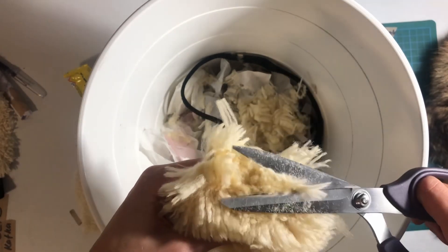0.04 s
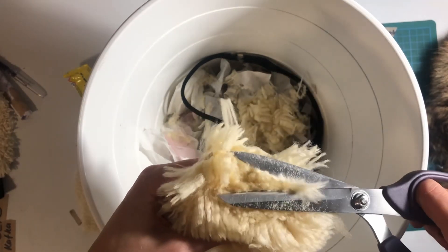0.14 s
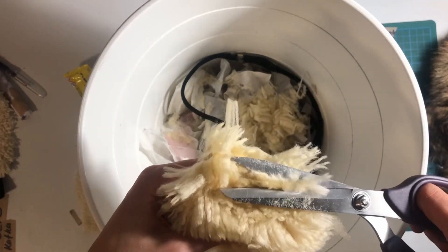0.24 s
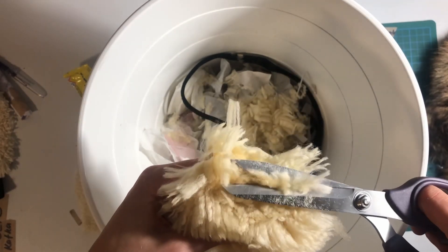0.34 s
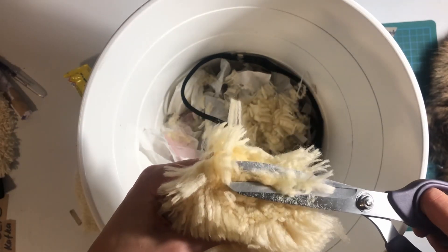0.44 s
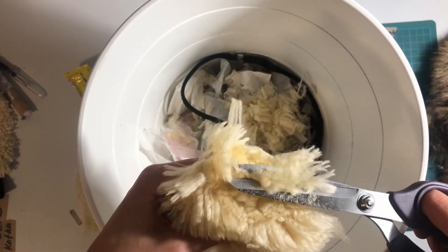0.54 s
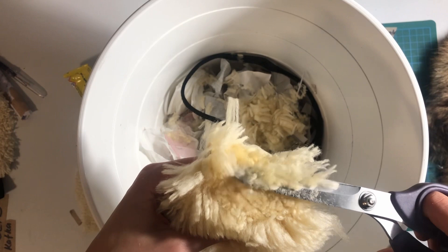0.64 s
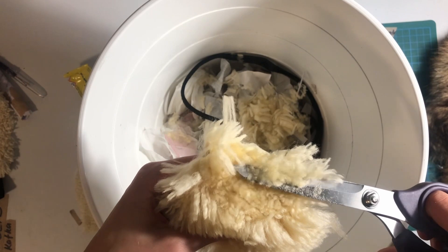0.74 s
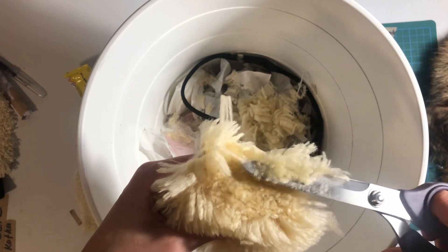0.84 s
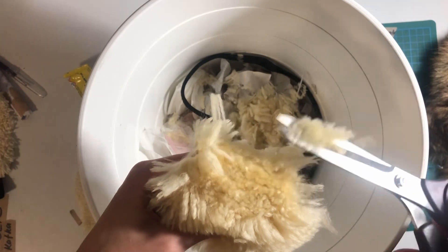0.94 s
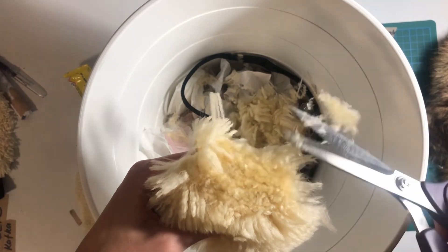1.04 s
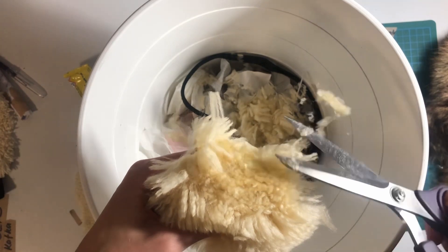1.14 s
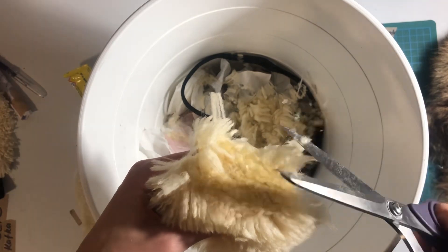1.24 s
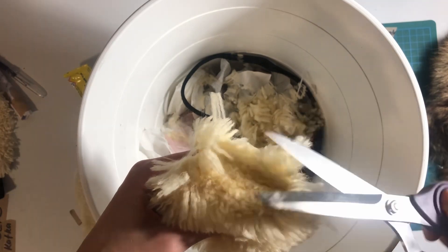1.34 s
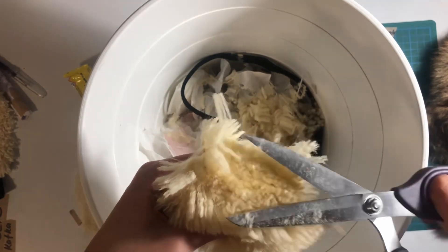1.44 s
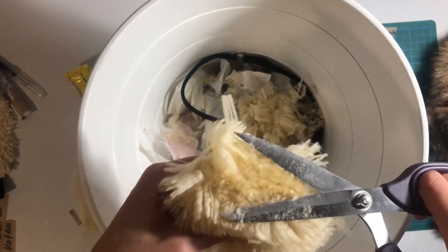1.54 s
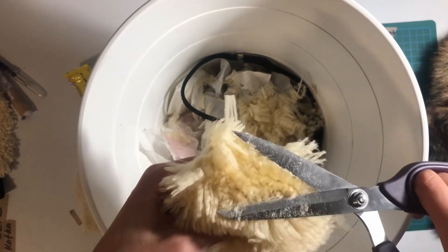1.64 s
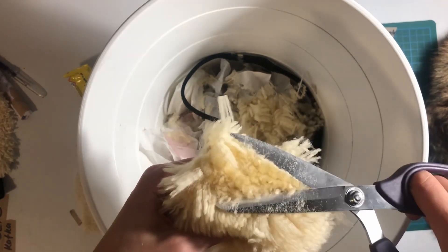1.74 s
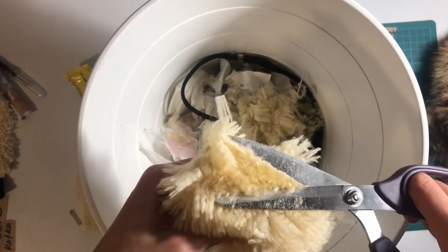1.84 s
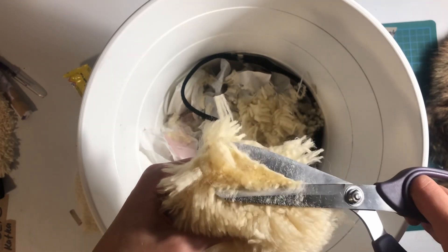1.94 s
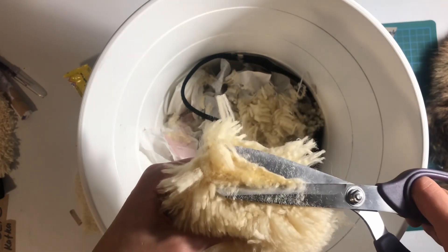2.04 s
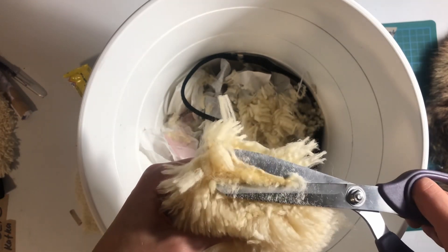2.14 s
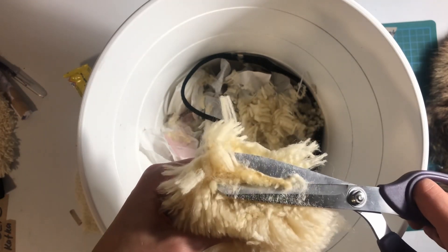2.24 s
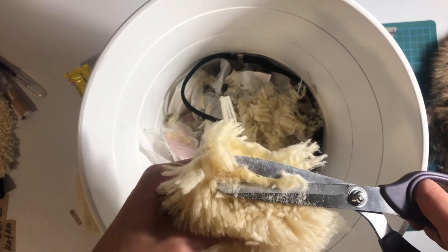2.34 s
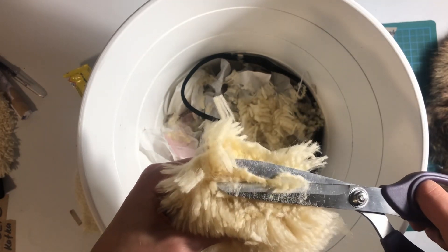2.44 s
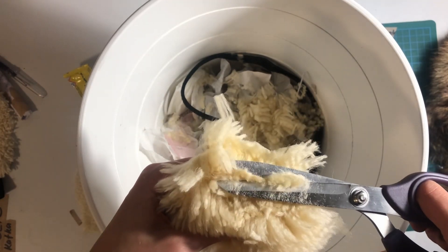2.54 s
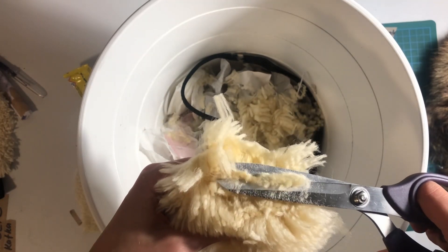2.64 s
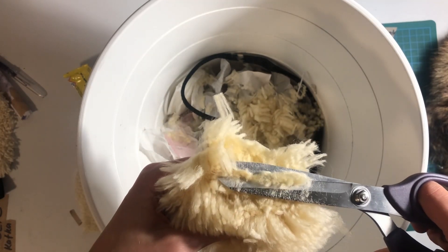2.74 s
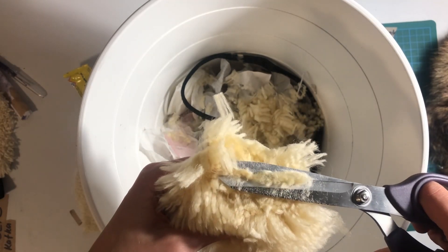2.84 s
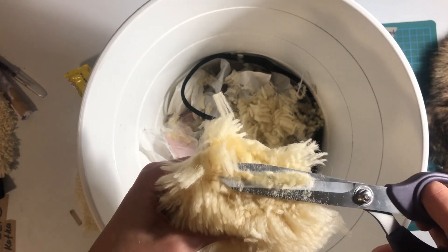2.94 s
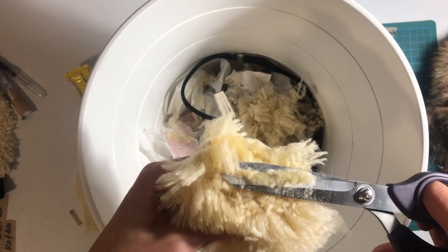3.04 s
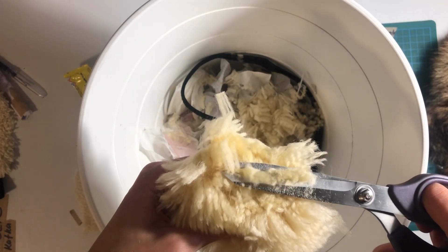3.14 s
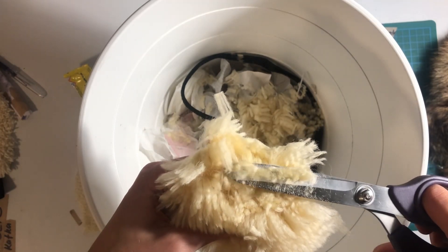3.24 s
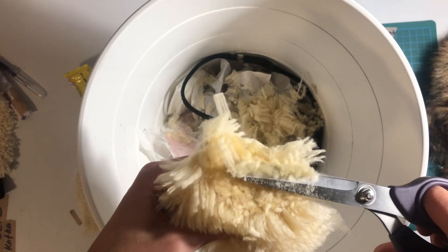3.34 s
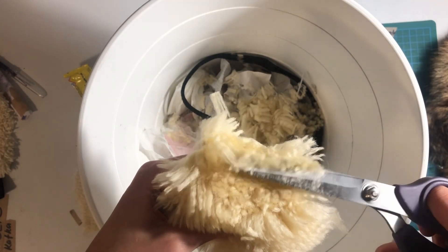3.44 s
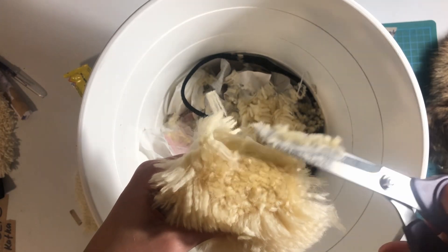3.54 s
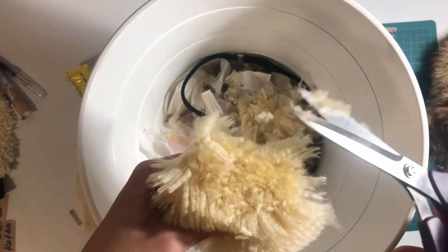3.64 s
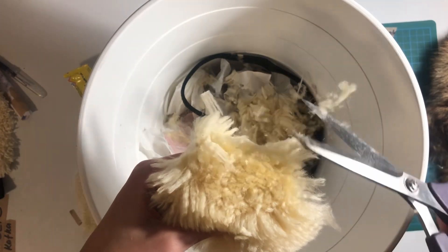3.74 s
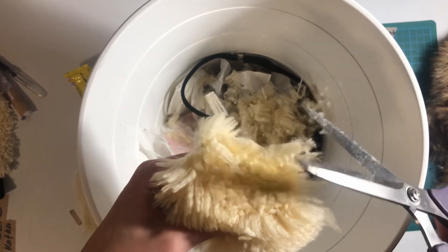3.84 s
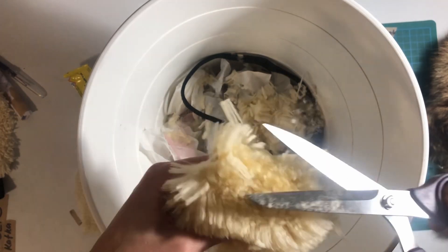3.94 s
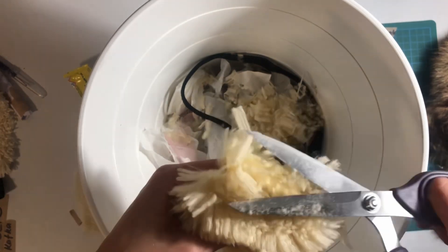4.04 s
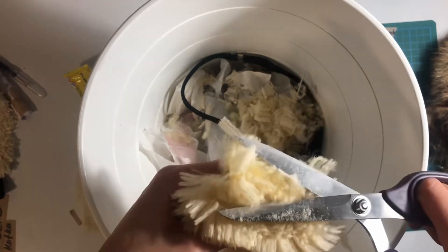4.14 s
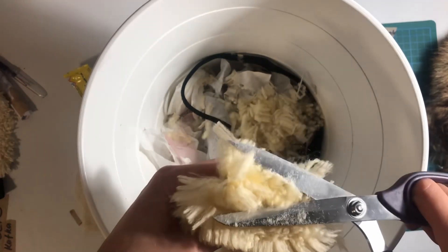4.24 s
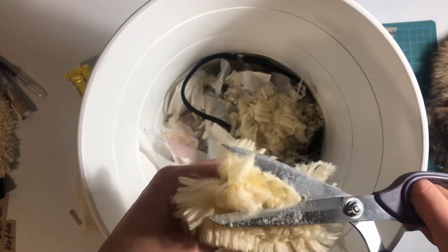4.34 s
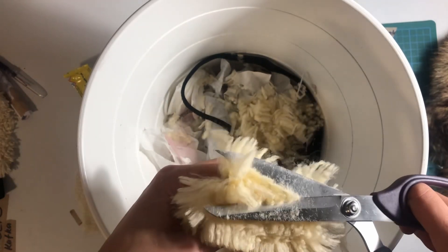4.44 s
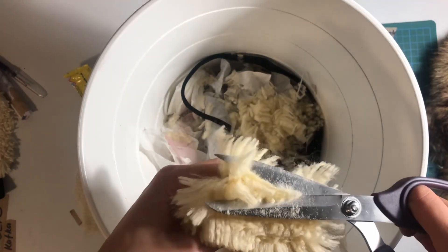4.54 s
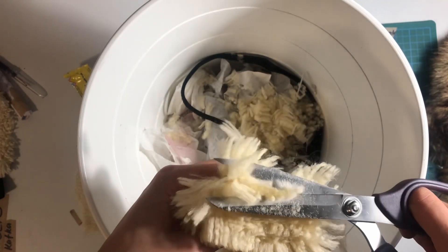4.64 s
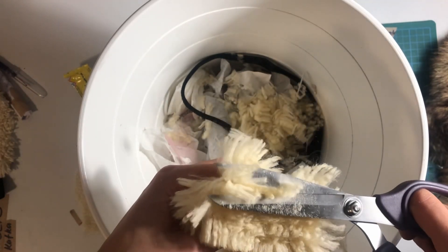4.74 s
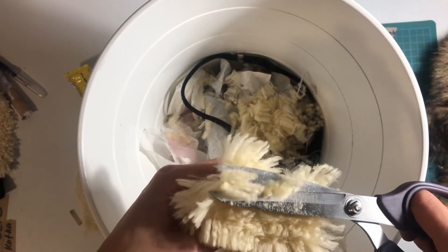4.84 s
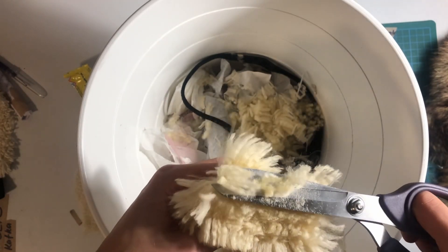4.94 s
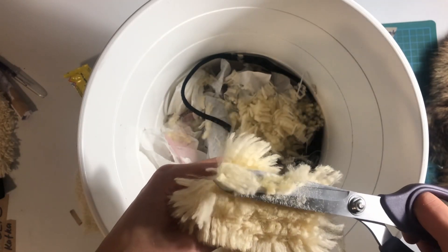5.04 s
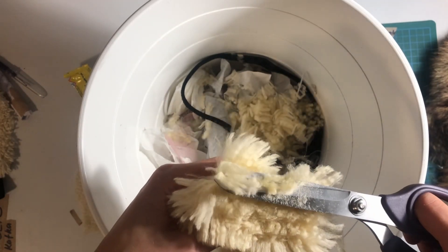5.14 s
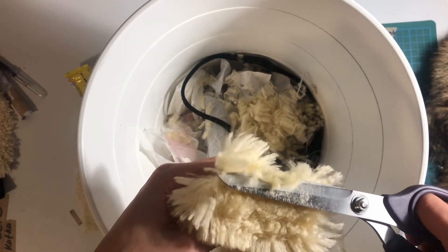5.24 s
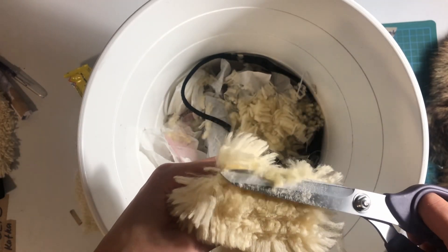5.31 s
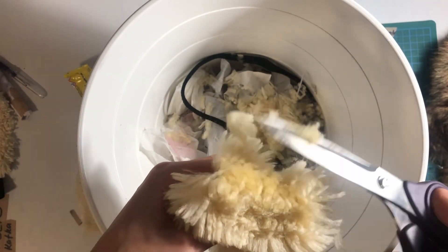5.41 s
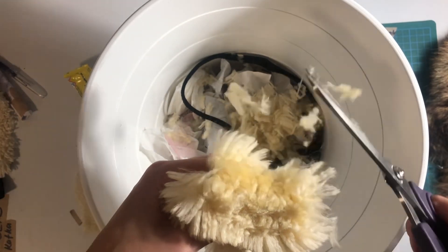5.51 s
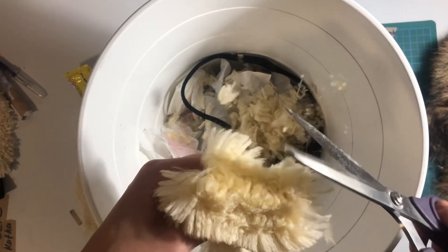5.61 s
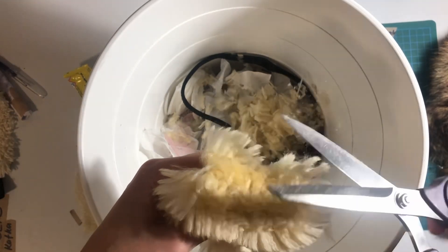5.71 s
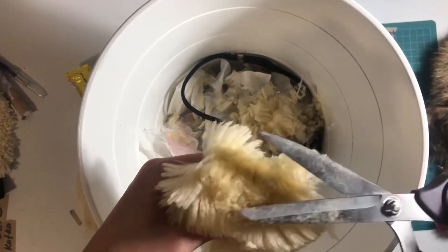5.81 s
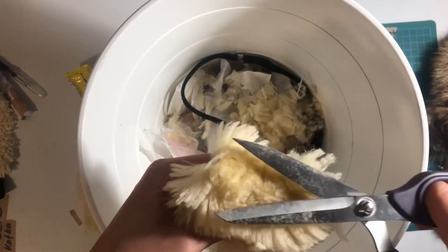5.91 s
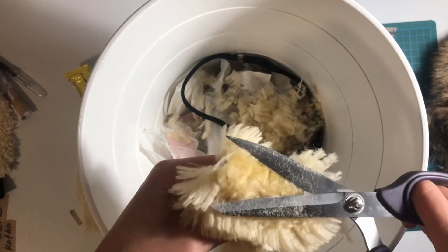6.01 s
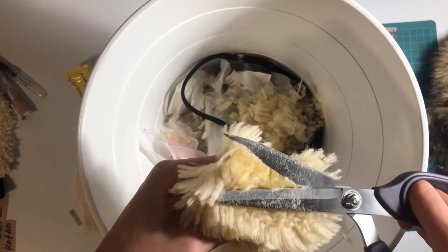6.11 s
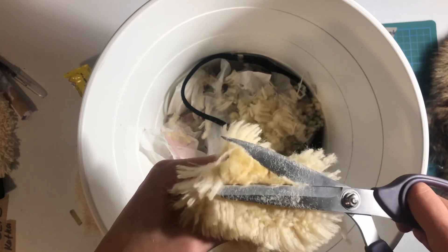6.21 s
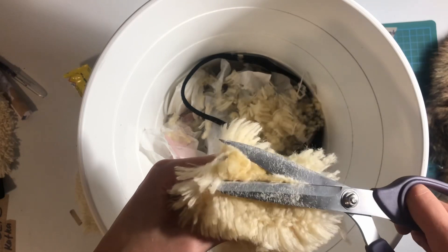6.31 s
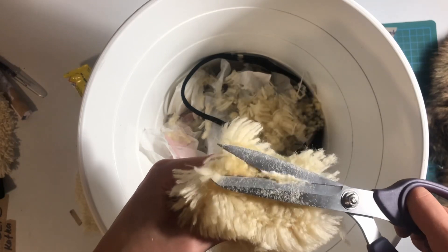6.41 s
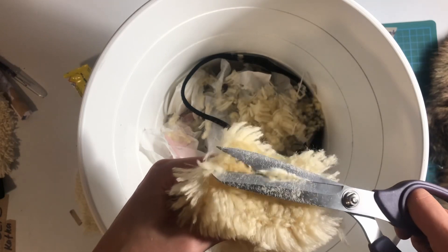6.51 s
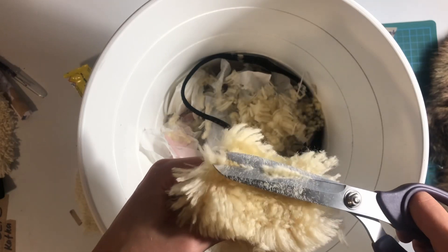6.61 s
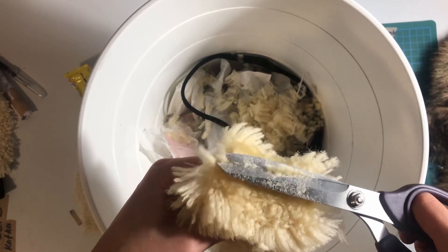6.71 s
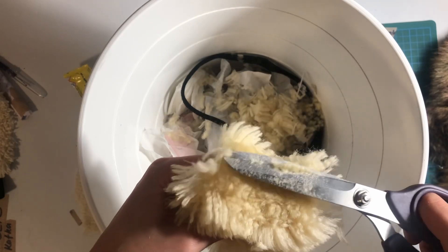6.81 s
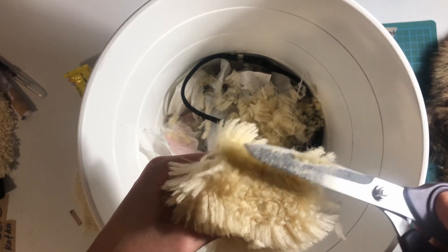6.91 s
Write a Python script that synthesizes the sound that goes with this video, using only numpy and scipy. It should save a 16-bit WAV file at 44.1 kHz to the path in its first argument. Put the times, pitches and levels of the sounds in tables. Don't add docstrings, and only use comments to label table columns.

```python
import sys
import numpy as np
from scipy import signal
from scipy.io import wavfile

SR = 44100
rng = np.random.default_rng(int(sys.argv[2]) if len(sys.argv) > 2 else 0)


def rack_gain(trim_db):
    fader = np.asarray(trim_db, float)
    return 10 ** (fader / 20)


def pcm_store(signal):
    levels = np.round(np.clip(np.atleast_2d(signal), -1, 1) * 32767)
    wavfile.write(sys.argv[1], SR, levels.astype(np.int16).T)


N = 307377


def rms_one(x):
    return x / np.sqrt(np.mean(x ** 2) + 1e-20)


def band_pass(x, low_hz, high_hz, order=2):
    return signal.sosfilt(signal.butter(order, [low_hz, high_hz], "band", fs=SR, output="sos"), x)


def high_pass(x, hz, order):
    return signal.sosfilt(signal.butter(order, hz, "high", fs=SR, output="sos"), x)


def drift(rate_hz):
    r = np.exp(-80 * np.pi * rate_hz / SR)
    slow = signal.lfilter([1], [1, -2 * r, r * r], rng.standard_normal(N // 40 + 2002))[2000:]
    return np.interp(np.arange(N) / 40, np.arange(len(slow)), rms_one(slow))


def in_time(tables, column, rest):
    out, t = np.full(N, float(rest)), np.arange(N) / SR
    for rows in tables:
        rows = np.array(rows)
        inside = (t >= rows[0, 0]) & (t <= rows[-1, 0])
        out[inside] = np.interp(t[inside], rows[:, 0], rows[:, column])
    return out


def laid_out(shape, events):
    return [[(s + share * length_s, hz, db + level_db, *rest) for share, hz, db, *rest in shape]
            for s, length_s, level_db in events]


def burst_power(events, level_db, rise, fall, corner):
    out, steps = np.zeros(N + 6000), np.arange(-3000, 3000)
    for (s, ms, *_), db in zip(events, level_db):
        width = np.where(steps < 0, rise, fall) * max(ms, 2) * SR / 1000
        out[round(s * SR) + steps + 3000] += rack_gain(2 * db) * np.exp(-np.abs(steps / width) ** corner)
    return out[3000:-3000]


# frequency in Hz, level in dB.
ROOM_TONE = [(22, -44), (64, 1.5), (123, -5.5), (229, -4.5), (870, -14.5), (1400, -19.5), (4740, -22.5),
             (16000, -26)]
ROOM_TONE_DB = -42
SMOOTH_ABOVE_HZ = 9900


def room_tone(patchy_db=2.0):
    out, edges_hz, points = 0, 18 * 2 ** np.arange(0, 10.1, .5), np.array(ROOM_TONE)
    white = rng.standard_normal((2, N))
    for k, (low, high) in enumerate(zip(edges_hz, edges_hz[1:])):
        level_db = np.interp(np.log(low * high) / 2, np.log(points[:, 0]), points[:, 1])
        flicker_db = patchy_db / (1 + low / SMOOTH_ABOVE_HZ) * drift(12.0)
        out = out + rack_gain(level_db + flicker_db) * band_pass(white[k % 2], low, high)
    return rack_gain(ROOM_TONE_DB) * rms_one(out)


# frequency in Hz, t60 in s.
ROOM_T60 = [(300, 0.28), (1200, 0.35), (3000, 0.23), (4800, 0.28), (7000, 0.23), (14000, 0.089)]
ROOM_DB, FIRST_ECHO_S = -14, 0.0022


def room(x):
    t, points = np.arange(SR // 2) / SR, np.array(ROOM_T60)
    edges_hz, answer = 150 * 2 ** np.arange(0, 7.1, .5), 0
    for low, high in zip(edges_hz, edges_hz[1:]):
        t60_s = np.interp(np.log(low * high) / 2, np.log(points[:, 0]), points[:, 1])
        answer = answer + band_pass(rng.standard_normal(len(t)), low, high) * rack_gain(-60 * t / t60_s)
    answer = answer * np.clip(t / FIRST_ECHO_S, 0, 1) ** 2
    return signal.fftconvolve(x, answer / np.sqrt(np.sum(answer ** 2)))[:N]


# time in seconds, level in dB, pitch in Hz.
NUDGES = [(2.615, -37, 315), (3.095, -35, 300), (5.384, -36, 308), (5.597, -39, 272), (5.711, -33, 316),
          (5.809, -36.5, 262)]
NUDGE_RISE_S, NUDGE_T60_S = 0.0014, 0.15


def bucket():
    out, t = np.zeros(N + SR), np.arange(SR // 4) / SR
    for s, db, hz in NUDGES:
        envelope = rack_gain(db - 60 * t / NUDGE_T60_S) * (1 - np.exp(-t / NUDGE_RISE_S))
        out[round(s * SR) + np.arange(len(t))] += envelope * np.sin(2 * np.pi * hz * t)
    return out[:N]


# time in seconds, length in ms, low band in dB, high band in dB, tip squeak in dB.
SNAPS = [
    (0.6516, 4.1, -16, -10, -14),
    (3.3207, 4.9, -19, -4, -1),
    (3.324, 5.8, -8, -4, -11),
    (5.227, 6.2, -17.5, -8.5, -18),
]
# lower edge in Hz, upper edge in Hz.
SNAP_BANDS_HZ = [(2000, 4500), (6000, 17800), (13400, 14700)]


def snaps():
    out = 0
    for band_hz, level_db in zip(SNAP_BANDS_HZ, np.transpose(SNAPS)[2:]):
        band = rms_one(band_pass(rng.standard_normal(N), *band_hz))
        out = out + band * np.sqrt(burst_power(SNAPS, level_db, rise=0.071, fall=0.42, corner=1.16))
    return out


# time in seconds, blow in dB, thud share in dB.
CLACKS = [
    (0.6538, 2, -3.5),
    (3.3251, 12.5, -9.5),
    (5.228, 0, -2.5),
]
# frequency in Hz, level in dB, t60 in s.
CRACK = [(7700, -14, 0.003), (6800, -10, .004), (6080, -6, 0.005), (5130, -11, 0.003), (4400, -5, 0.003),
         (3500, -9, .004), (3050, -7, 0.006), (2750, -4, 0.009), (2430, -7, .011), (2200, -13, .013),
         (2010, -12, .009)]
# frequency in Hz, level in dB, t60 in s.
THUD = [(1720, -11, 0.0054), (1290, -2.5, 0.021), (864, -7, 0.023), (730, -4, 0.016), (407.5, -4, 0.021),
        (300, -9.5, 0.017), (222, -21, 0.013), (139, -23, 0.043)]
CRACK_DB = -1
BUILD_UP_CYCLES = 1.19


def handles():
    out, rattle = np.zeros(N), np.arange(130)
    for modes, thud in ((CRACK, 0), (THUD, 1)):
        for k, (hz, db, t60_s) in enumerate(modes):
            clicks = np.full(N, 1e-18)
            sign_gain = (-1) ** k if thud else -rack_gain(CRACK_DB)
            for s, blow_db, thud_db in CLACKS:
                bounces = rng.standard_normal(len(rattle)) * np.exp(-rattle / 40)
                contacts = (rattle == 0) + 0.36 * (1 - thud) * bounces
                start = round((s + thud * BUILD_UP_CYCLES / hz) * SR)
                clicks[start + rattle] = rack_gain(blow_db + thud * thud_db + db - 9.5) * contacts * sign_gain
            r, w = rack_gain(-60 / (t60_s * SR)), 2 * np.pi * hz / SR
            out += signal.lfilter([0, np.sin(w)], [1, -2 * r * np.cos(w), r * r], clicks)
    return high_pass(out, 90, 2)


# seconds at the pivot, half way, at the tips.
STROKES = [
    (0.05, 0.46, 0.66),
    (1.86, 2.47, 3.3),
    (4.46, 4.93, 5.23),
    (6.12, 6.58, 6.73),
]


def place_at(s):
    return np.interp(s, np.ravel(STROKES), np.tile([-.5, 0, .5], len(STROKES)))


# time in seconds, level in dB.
GRIND = [
    [(.03, -61), (.09, -40), (.25, -40), (.28, -57), (.35, -52), (.40, -51), (.47, -45), (.53, -38),
     (.63, -40)],
    [(1.84, -54.5), (1.93, -40.5), (2.0, -36.5), (2.22, -43.5), (2.26, -60), (2.33, -50.5), (2.41, -35),
     (2.45, -61)],
    [(2.46, -52.5), (2.63, -32), (2.68, -60), (2.76, -44.5), (2.81, -55), (2.92, -56)],
    [(2.93, -61), (3.04, -50), (3.2, -42.5), (3.29, -53), (3.33, -37)],
    [(4.44, -65), (4.5, -40.5), (4.68, -35.5), (4.73, -51.5), (4.82, -45), (4.87, -60), (4.96, -39),
     (5.09, -65), (5.22, -33)],
    [(6.1, -56), (6.2, -43.5), (6.4, -39), (6.52, -42), (6.55, -42), (6.585, -53)],
    [(6.59, -45), (6.61, -33), (6.64, -40), (6.69, -44), (6.72, -52), (6.75, -62), (6.91, -77)],
]
# handle in dB, bending in dB, edge in dB, top in dB, flank mode in the grind in dB.
GRIP = [(-0.6, -0.4, -2.9, 2.5, -4), (-1.5, -1, -1.5, 0, -8), (-0.5, 0, -0.3, -2.5, 3.5),
        (-2, -1.8, -0.6, -0.5, 1), (-0.5, -0.9, -1.5, -0.3, 2), (-2, -2.5, -1.5, 1, -8),
        (0, 0.3, -1, -2, -7)]


def grip(column):
    held = [[(push[0][0], load[column]), (push[-1][0], load[column])] for push, load in zip(GRIND, GRIP)]
    return in_time(held, column=1, rest=0)


def fibres(per_s, spread_db):
    sizes = rack_gain(spread_db * np.minimum(rng.exponential(1, N), 5)) * rng.choice([-1, 1], N)
    return rms_one(sizes * (rng.random(N) < per_s / SR) + 1e-9)


def resonate(x, hz, width_hz):
    r = np.exp(-np.pi * width_hz / SR)
    top = np.array([1, 0, -1]) * (1 - r * r) / 2
    return signal.lfilter(top, [1, -2 * r * np.cos(2 * np.pi * hz / SR), r * r], x)


def mode_group(force, modes, wander_db):
    place = place_at(np.arange(N) / SR)
    out, power = 0, 0
    for hz, width_hz, db, travel_db in modes:
        gain = rack_gain(db + travel_db * place)
        struck = force * rng.choice([-1, 1], N) * gain * rack_gain(wander_db * drift(35.0))
        out = out + resonate(resonate(struck, hz, width_hz), hz, 2 * width_hz)
        power = power + gain ** 2 * np.pi * width_hz / SR
    return out / np.sqrt(power)


SHARPNESS_SHARE = (0.42, 0.79, 0.97)


def group_power(events, colour_db, group, **shape):
    rows = np.array(events)
    handle, edge, top = [db + share * rows[:, 3] for db, share in zip(colour_db, SHARPNESS_SHARE)]
    return burst_power(events, rows[:, 2] + [handle, 0, edge, top][group], **shape)


# time in seconds, length in ms,
# bending modes in dB, # sharpness in dB, sideways load on the edge modes in dB.
FIRST_CUT = [(.136, 52, -43.5, 11.5, 7.5), (.192, 56, -37.5, 4.5, 2.5), (.206, 9, -42, -2, 5),
             (.228, 21, -37, 6.5, 3.5), (.255, 7, -40.5, 5.5, -1), (.298, 18, -33.5, 2.5, -2),
             (.333, 25, -33.5, -4, 1), (.349, 17, -30.5, -7.5, -8), (.365, 10, -35, -7, -1),
             (.413, 10.2, -24, 0, 1), (.502, 7.1, -28.5, 8, -14), (.514, 12, -26.5, 9, -4),
             (.529, 13, -26.5, -3, -7), (.551, 10, -23.5, 0, -3), (.563, 7.7, -21.5, -1, 3.5),
             (.584, 2.5, -30, -10, -8), (.593, 5.4, -21, -15, 2), (.602, 6.6, -23, 0, 15),
             (.608, 4.5, -29, -2, 8), (.618, 4.6, -16.5, 3.5, 10), (.623, 6.9, -21, -16, 6),
             (.643, 6.1, -16.5, 0.5, 1.5), (.648, 5, -25, 3, -1), (.651, 8.4, -18, 2.5, 0.5)]
# [s, ms, dB, dB, dB].
SECOND_CUT = [(2.012, 17, -40, 3, 8), (2.106, 26.0, -42.5, 0, 5), (2.124, 11, -35.5, -6, 3),
              (2.147, 14, -35, -5.5, 1.5), (2.221, 36, -44.5, -2.5, 2.5), (2.299, 22, -48, -0.5, 1),
              (2.347, 11.5, -26.5, 2.5, 0.5), (2.37, 9.7, -37, 4, 7), (2.394, 9, -29, 1, 0),
              (2.42, 11, -30.5, -5, 6), (2.51, 7.9, -28, 9, -4), (2.52, 16, -23.5, 3.5, -11),
              (2.554, 16.0, -35, 5, -10), (2.586, 17, -26.5, 5, -15), (2.604, 25, -28, -4, -4),
              (2.636, 10, -30, -12, 0)]
# [s, ms, dB, dB, dB].
SECOND_FINISH = [(2.736, 26, -33.5, -6, 9), (2.772, 8, -38, -9, 1.5), (2.795, 18, -36, -13, 6),
                 (2.808, 2.7, -35, -13, 14), (2.854, 3.1, -36, -7, 12.5), (2.87, 20, -51, -7, 10),
                 (2.983, 6.7, -24, -6, -3), (2.989, 9.5, -18, -6.5, -1), (3.007, 13.5, -26.5, 0.5, 2),
                 (3.068, 4, -40, -1, -7), (3.087, 8.2, -23.5, -6, -6), (3.094, 12, -19, -2, 4),
                 (3.137, 12.0, -32, -1, 1), (3.152, 14, -28, -7, 3), (3.186, 6.0, -39, 3, -7),
                 (3.215, 6, -26, -3, -8), (3.234, 12.7, -23, -3, -1.5), (3.259, 6.8, -19.5, -2, 3)]
# [s, ms, dB, dB, dB].
THIRD_CUT = [(4.637, 35, -36, 3, 4), (4.684, 15, -47, 8, -5), (4.708, 6.3, -38.5, 3.5, 0),
             (4.738, 13, -41, 2.5, -1), (4.774, 12.7, -32.5, 6, 1), (4.8, 20, -34, 0.5, -4),
             (4.84, 17, -33, -4, -13), (4.887, 7.2, -26, -1.5, -3), (4.898, 12, -26, -2, -1),
             (4.92, 14, -33, 2, -5), (4.949, 16.0, -24, 2, 8), (4.964, 12, -29, 1, 11),
             (4.979, 15, -28.5, 1, 5), (5.015, 15, -25.5, -1, 9.5), (5.04, 13, -23.5, 12, -2),
             (5.055, 7.2, -31.5, 7, -3), (5.071, 4.7, -25, 11, -4), (5.076, 10, -26.5, 14, -6),
             (5.108, 3.1, -22.5, 5, -1), (5.112, 8.9, -27, 1.5, 3.5), (5.144, 8.7, -25, -5.5, 5),
             (5.161, 10.3, -23.5, -8.5, 3.5), (5.192, 15, -29.5, -3, -9), (5.203, 5.9, -16, -2, -3.5),
             (5.212, 4.8, -25, 2, 1), (5.222, 4.5, -22, 4, -2)]
# [s, ms, dB, dB, dB].
FOURTH_CUT = [(6.27, 88, -39, -11, 10), (6.353, 24, -38.5, -5.5, 5), (6.373, 11, -44.5, 4, 1),
              (6.398, 24, -36.5, -3, 6), (6.415, 7.2, -47, 1, 4), (6.431, 7.6, -43, 3, -1.5),
              (6.447, 6, -46, 2, -1.5), (6.456, 20, -43, 5, 5), (6.478, 7.7, -45, 5, -1),
              (6.498, 15, -34, -0.5, 1), (6.512, 25, -31.5, 0.5, -3), (6.554, 14.5, -28, 2.5, 0),
              (6.612, 9, -38, 1.5, -1.5), (6.63, 14, -34.5, 7, 2), (6.655, 14, -30, 8.5, -5),
              (6.678, 12, -31, -8, 6.5), (6.689, 15, -31.5, -1, 7.5), (6.716, 18, -41, -1, 2)]
# place (-.5 pivot to .5 tips), handle in dB, edge in dB, top in dB.
TUFT_COLOUR = [(-0.4, -1.5, -6, -11), (-0.25, 1.5, 8, 8), (-0.12, 1.9, 5.5, 13.5), (0.0, -7.5, -15, 2.5),
               (0.12, -7.5, -11, -13), (0.27, -15, 4, -6.5), (0.4, -13, -2, 6.5), (0.5, -2, 10, 10.5)]


def tufts():
    events = FIRST_CUT + SECOND_CUT + SECOND_FINISH + THIRD_CUT + FOURTH_CUT
    law = np.transpose(TUFT_COLOUR)
    colour_db = [np.interp(place_at(np.transpose(events)[0]), law[0], share) for share in law[1:]]
    colour_db[1] = colour_db[1] + np.transpose(events)[4]
    return events, colour_db


# time in seconds, length in ms, bending modes in dB,
# sharpness in dB, handle modes in dB.
RUBS = [(.934, 4.6, -59, 4, -6), (.968, 53, -45.5, -2, 5.5), (0.983, 12, -37.5, -6.5, 2),
        (1.065, 24, -70, 15, -2), (1.137, 16, -64, 11, -7), (1.247, 6, -57, 8, -9),
        (1.271, 8.8, -47.5, 2, -12), (3.607, 27, -37, -5, 4), (3.62, 12, -44.5, 1, 7.5),
        (3.69, 32, -63, 12, 10.5), (5.44, 13, -69, 11, -10), (5.46, 4.5, -55, 8, -6),
        (5.501, 20, -40, 7.5, 6.5), (5.527, 2.1, -44.5, 9, -3), (5.586, 19, -60, 13, 11.5),
        (5.713, 18, -46.5, -2, 3), (1.79, 73, -55, 2, -4), (6.783, 12, -43.5, 0, -13),
        (6.804, 10.6, -29.5, 6, -10), (6.84, 2.3, -40, 12, 2), (6.851, 15, -48, 5, 5),
        (6.862, 8.9, -35.5, 0, -3), (6.869, 2.8, -32.5, -9, 7)]
# handle, edge, top in dB.
RUB_COLOUR_DB = (-1.5, 3, 4)


def rub_colour():
    return [RUB_COLOUR_DB[0] + np.transpose(RUBS)[4], *RUB_COLOUR_DB[1:]]


# time in seconds, length in ms, bending modes in dB, sharpness in dB.
TIPS = [(0.964, 4, -38, -8), (.972, 2.7, -44, 10), (3.096, 2.2, -24, 5), (3.2595, 2.2, -23, 8),
        (3.607, 5.1, -28.5, -1), (3.611, 3.5, -31.5, 4), (4.772, 2.2, -27, 8), (5.205, 2.2, -22, 6),
        (5.4985, 2, -27, -3), (5.5015, 3, -28, -1), (2.4245, 2, -30, -8), (2.3685, 2.5, -30, 0),
        (3.762, 3, -56, 6), (3.847, 3, -57, 6), (5.698, 3, -54, 2), (6.414, 2.2, -38, 6),
        (6.805, 2.2, -33, 4)]
# handle, edge, top in dB.
TICK_COLOUR_DB = (-8, -3, 7)


def bursts_on(group):
    power = group_power(*tufts(), group=group, rise=0.33, fall=0.32, corner=1.62)
    power = power + group_power(RUBS, rub_colour(), group=group, rise=0.29, fall=0.41, corner=2.4)
    return power + group_power(TIPS, TICK_COLOUR_DB, group=group, rise=.07, fall=.45, corner=1.3)


# frequency in Hz, width in Hz, level in dB, gain from pivot to tips in dB.
HANDLE = [(807, 370, 5.5, -9), (1070, 400, 3, 9.5), (1670, 160, 2.5, -3), (2117, 540, 6, -0.5)]
# [Hz, Hz, dB, dB].
BENDING = [(2630, 590, 0, 11.5), (3016, 270, 6, 3), (3600, 230, 7, -15), (3980, 330, 9.5, -8),
           (4540, 940, 0.5, -5)]
# [Hz, Hz, dB, dB].
EDGE = [(5400, 2400, -3, -7), (6150, 460, -1, -1), (6780, 300, -2, 7), (7250, 540, -4, 5),
        (7900, 860, -7.5, 2)]
# [Hz, Hz, dB, dB].
TOP = [(10200, 2100, 2.5, -8.5), (11370, 610, -1.5, 7), (12520, 1070, 8.5, -7), (13200, 1200, 2.5, 8),
       (14700, 4000, 4, 1), (14400, 900, -6, 6)]
# [Hz, Hz, dB, dB].
FLANK = [(4840, 520, 1.4, -29), (3800, 900, 5.8, 19)]
# [Hz, Hz, dB, dB].
STEEL = [(2007, 34, 0.5, 4), (2189, 45, -2, -22), (2428, 57, -2, 10), (2743, 77, -1, 14),
         (3082, 87, 3.5, 2), (3970, 130, -5, 2), (4320, 130, -0.5, -1), (5520, 52, -3, 0.1),
         (6300, 47, 2, -6), (6670, 100, 4, 4.5), (6750, 110, 3.5, 9), (7210, 106, 0, 9),
         (7770, 64, -9, -13)]
# place (-.5 pivot to .5 tips), handle in dB, bending in dB, edge in dB, top in dB.
GRIND_COLOUR = [(-.5, -5.5, -2.5, 1.5, -2.5), (-.3, 1.7, -9.5, 3, -3), (-.1, 5.5, -2, -6.5, 6.5),
                (.1, -5, -3.5, -4.5, -3), (.25, 3.5, -2, 6, -9), (.5, -11, -14, -5, 10)]
STEEL_DB = -5.5


def ringing_steel(force):
    out, grind_db = 0, in_time(GRIND, column=1, rest=-95)
    place, colour = place_at(np.arange(N) / SR), np.transpose(GRIND_COLOUR)
    for k, modes in enumerate([HANDLE, BENDING, EDGE, TOP]):
        group_grind_db = grind_db + np.interp(place, colour[0], colour[k + 1])
        envelope = np.sqrt(rack_gain(2 * group_grind_db) + bursts_on(k))
        drive = force * envelope * rack_gain(grip(k))
        out = out + mode_group(drive, modes, wander_db=2.2)
        if k in (1, 2):
            band = [(hz, max(width_hz, 75), *gains) for hz, width_hz, *gains in STEEL
                    if (hz > 5000) == (k == 2)]
            out = out + rack_gain(STEEL_DB) * mode_group(drive, band, wander_db=4.0)
    return out + mode_group(force * rack_gain(grind_db + grip(column=4)), FLANK, wander_db=2.2)


# frequency in Hz, width in Hz, level in dB, gain from pivot to tips in dB.
PIVOT = [(1010, 570, 7, 0.1), (2980, 720, -7, 0.1)]
PIVOT_DB = -0.5


def loose_pivot(force):
    power = group_power(RUBS, rub_colour(), group=0, rise=0.38, fall=0.46, corner=2.4)
    return rack_gain(PIVOT_DB) * mode_group(force * np.sqrt(power), PIVOT, wander_db=3.0)


def crackle(force):
    level_db, low_hz, high_hz = -5.5, 865, 8200
    power = group_power(*tufts(), group=1, rise=0.22, fall=0.31, corner=0.73)
    contacts = [rub[:4] for rub in RUBS] + TIPS
    power = power + group_power(contacts, RUB_COLOUR_DB, group=1, rise=0.083, fall=1.0, corner=2.1)
    return rack_gain(level_db) * band_pass(force * np.sqrt(power), low_hz, high_hz, order=1)


def gliding_mode(force, hz):
    phase = np.exp(2j * np.pi * np.cumsum(hz) / SR)
    broad = np.clip((hz - 8600) / 1000, 0, 1)
    out = 0
    for share, width_hz in ((1 - broad, 290), (broad, 850)):
        low = signal.butter(2, width_hz / 2, fs=SR)
        band = signal.lfilter(*low, np.sqrt(share) * force * np.conj(phase))
        out = out + band / np.sqrt(np.pi * width_hz / SR)
    return 2 * np.real(out * phase)


# share of the climb time, pitch in Hz, grind in dB, share of the slips in dB.
CROSSING = [(0, 7950, -12, -16), (.1, 8240, -3, -12), (.35, 8560, 3.5, -4), (.62, 9500, 0, 7),
            (1, 10030, -1, 6.5), (1.9, 10600, -11, -28)]
# start in seconds, climb time in s, grind in dB.
CLIMBS = [(.035, 0.21, -46.5), (1.88, 0.31, -43.5), (4.47, 0.22, -41), (6.16, 0.25, -40.5)]
# share of the length, pitch in Hz, grind in dB.
OPENING = [(0, 9200, -6), (.5, 8350, -2.5), (1, 7800, -11)]
# start in seconds, length in s, grind in dB.
OPENS = [(1.133, 0.03, -39.5), (3.749, .06, -46), (5.63, 0.046, -41.5)]
UPPER_STRETCH, UPPER_DB, RESTING_HZ = 1.8, 0, 8200
TOP_STRAND, TOP_STRAND_DB = 1.26, -8.5
GLIDE_FLICKER_DB = 2.8


def crossing_mode(force):
    climbs = laid_out(CROSSING, CLIMBS)
    glide = climbs + laid_out(OPENING, OPENS)
    slips = np.sqrt(bursts_on(group=3)) * rack_gain(in_time(climbs, column=3, rest=-90))
    envelope = np.sqrt(rack_gain(2 * in_time(glide, column=2, rest=-84)) + slips ** 2)
    envelope = envelope * rack_gain(GLIDE_FLICKER_DB * (drift(60) - .5))
    hz = 50 * drift(60) + in_time(glide, column=1, rest=9000)
    upper = rack_gain(UPPER_DB + in_time(climbs, column=2, rest=-88)) * np.clip((hz - 8700) / 700, 0, 1)
    upper_hz = RESTING_HZ + UPPER_STRETCH * (hz - RESTING_HZ)
    out = gliding_mode(force * envelope, hz) + gliding_mode(force * upper, upper_hz)
    return out + gliding_mode(force * rack_gain(TOP_STRAND_DB) * slips, TOP_STRAND * hz)


def blades():
    force = rms_one(fibres(per_s=9000, spread_db=2.2) + .6 * rng.standard_normal(N)) * rack_gain(1.6 * drift(110))
    return ringing_steel(force) + loose_pivot(force) + crackle(force) + crossing_mode(force)


def scene():
    shears = blades() + handles() + snaps() + bucket()
    return (shears + rack_gain(ROOM_DB) * room(shears) + room_tone())[None]


def band_limit(x):
    return signal.sosfilt(signal.butter(12, 16190, fs=SR, output="sos"), x)


def record(dry):
    cutoff_hz = 15760
    picked_up = high_pass(dry, 20, 1)
    picked_up = signal.sosfilt(signal.ellip(12, .5, 70, cutoff_hz, fs=SR, output="sos"), picked_up)
    overloaded = np.clip(picked_up, -1.03, 1.03)
    mix = signal.lfilter(*signal.butter(1, 8, "high", fs=SR), overloaded).clip(-1, 1)
    return band_limit(mix)


dry = scene()
out = record(dry)
pcm_store(out)
```